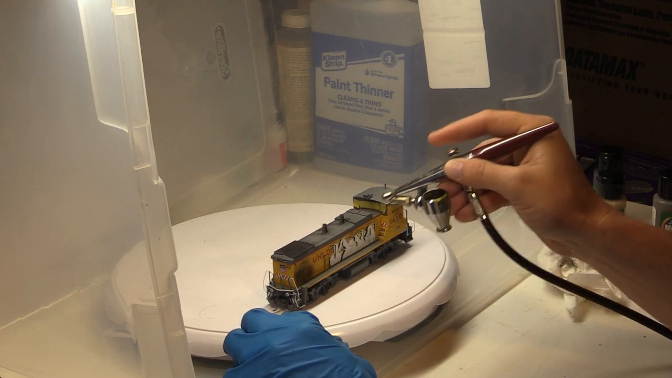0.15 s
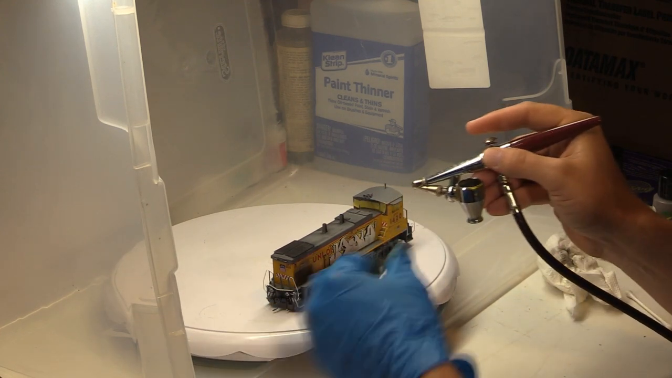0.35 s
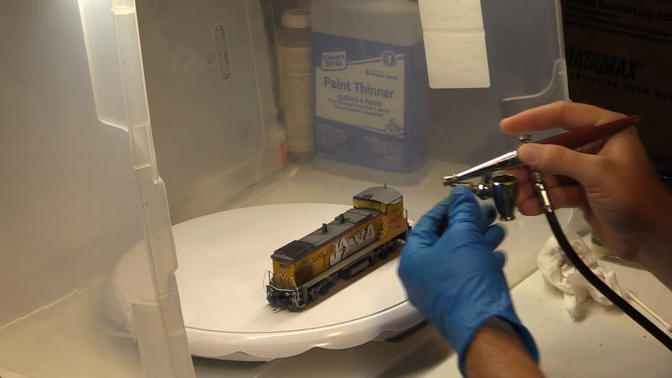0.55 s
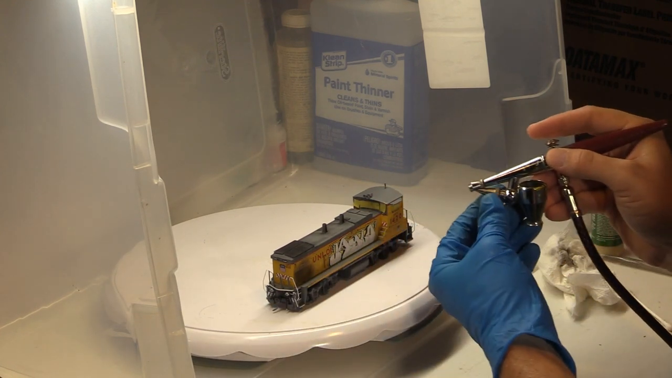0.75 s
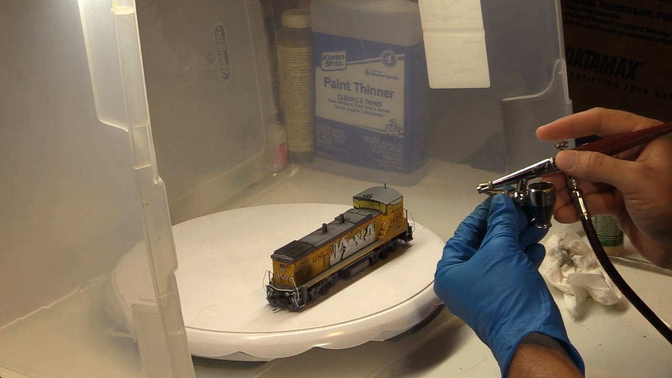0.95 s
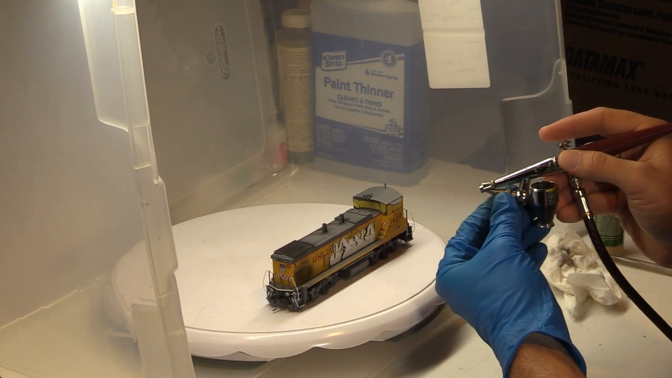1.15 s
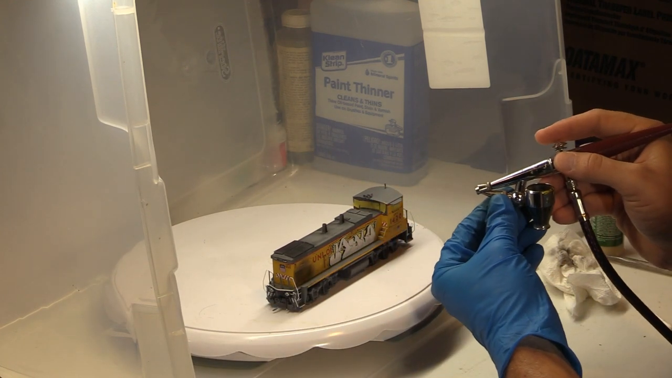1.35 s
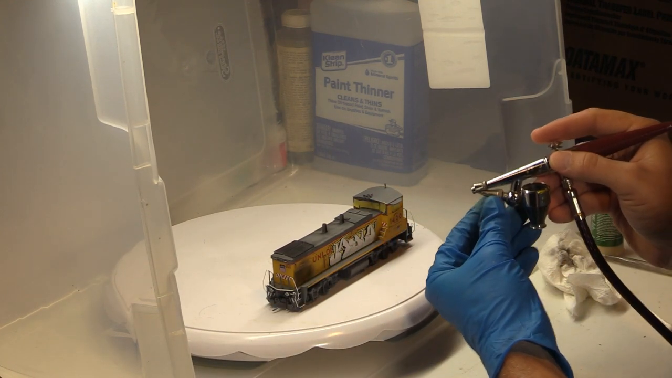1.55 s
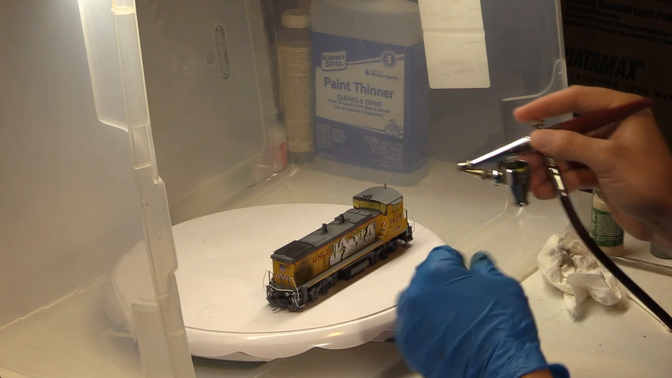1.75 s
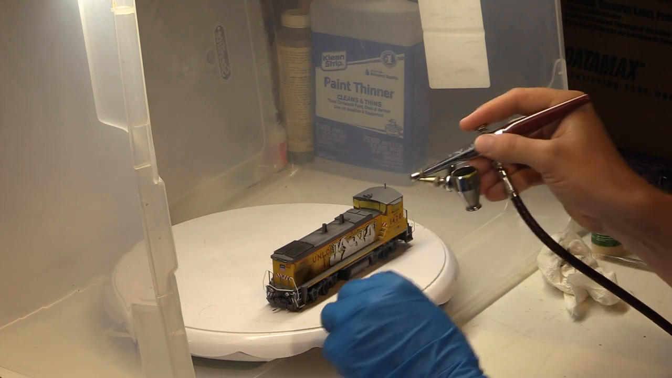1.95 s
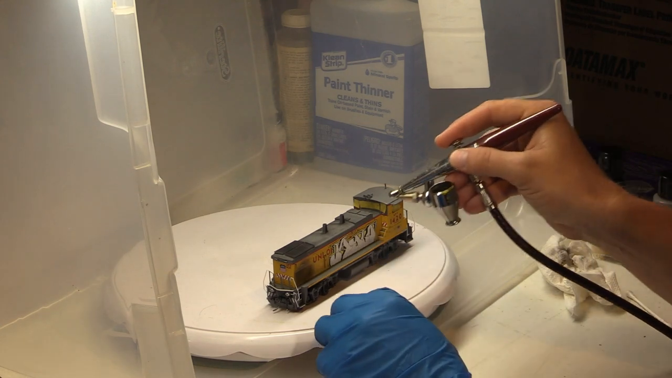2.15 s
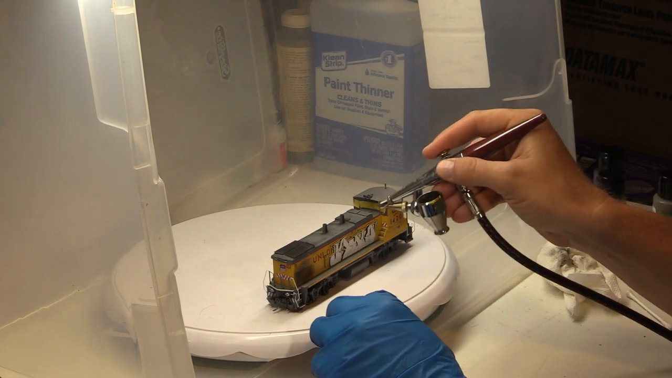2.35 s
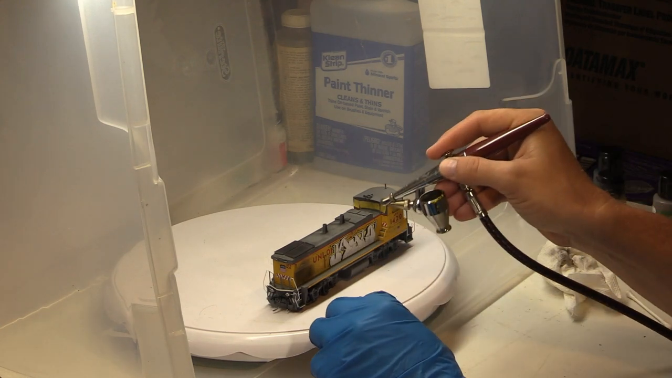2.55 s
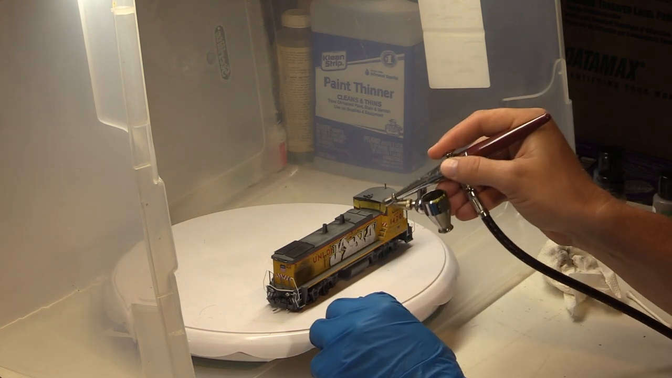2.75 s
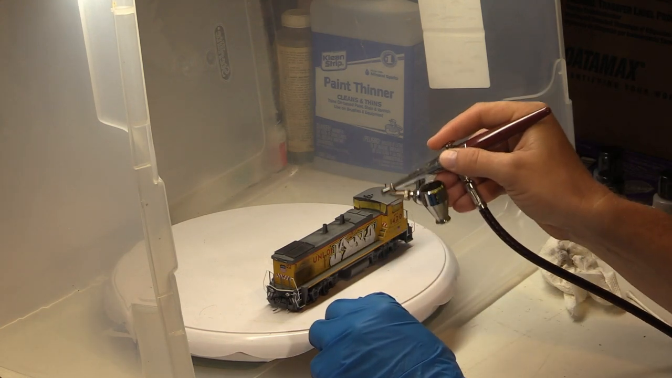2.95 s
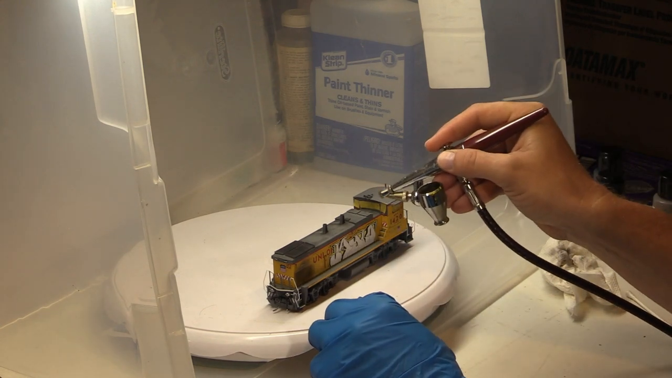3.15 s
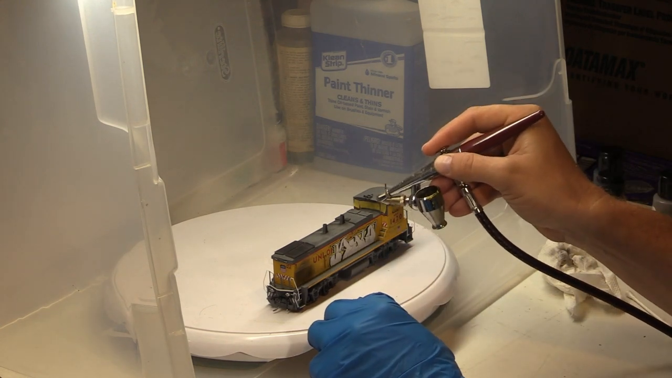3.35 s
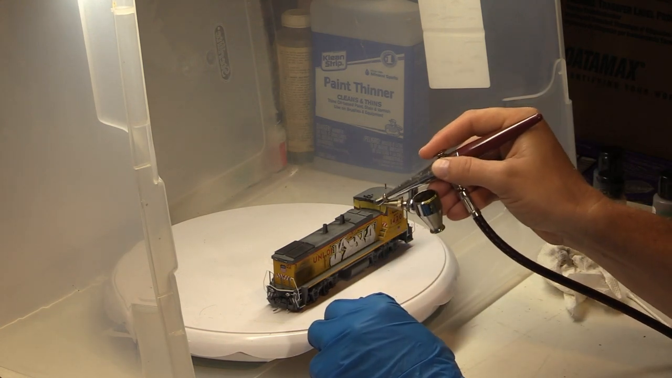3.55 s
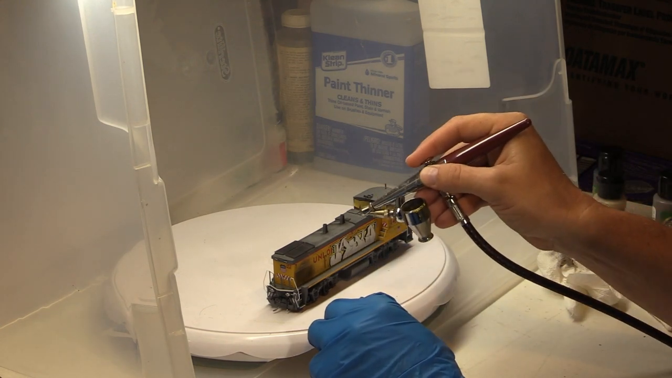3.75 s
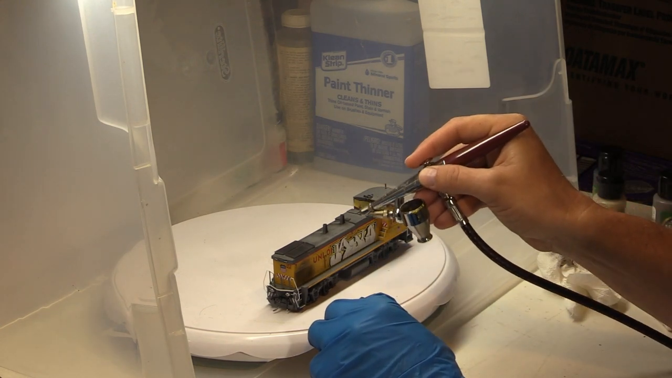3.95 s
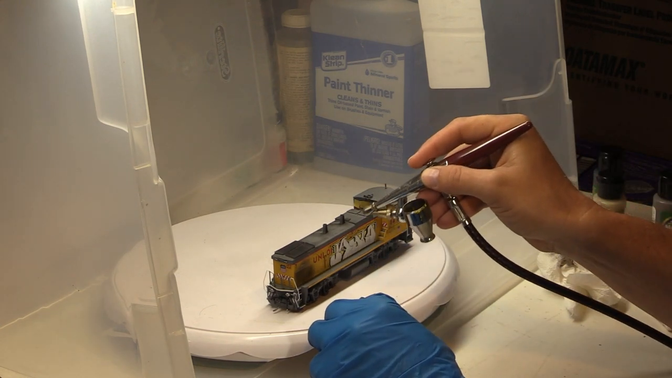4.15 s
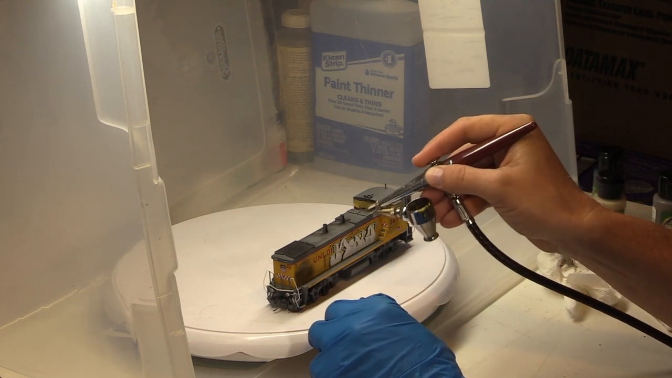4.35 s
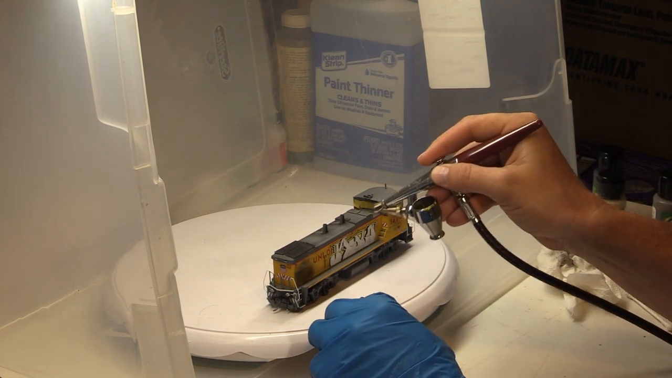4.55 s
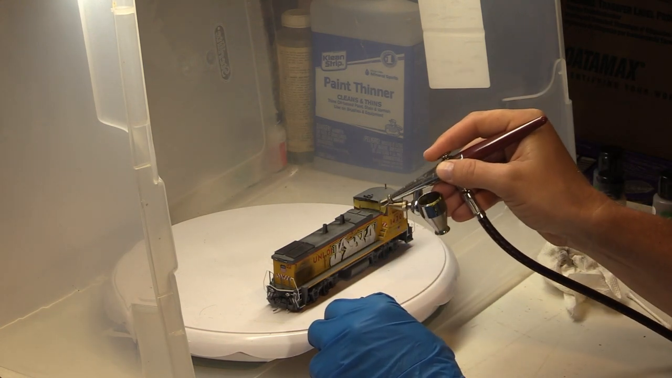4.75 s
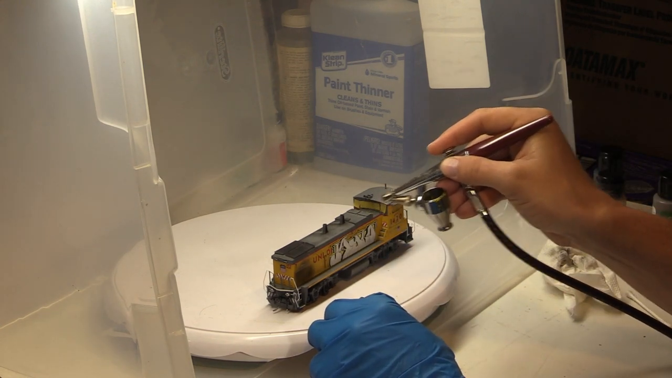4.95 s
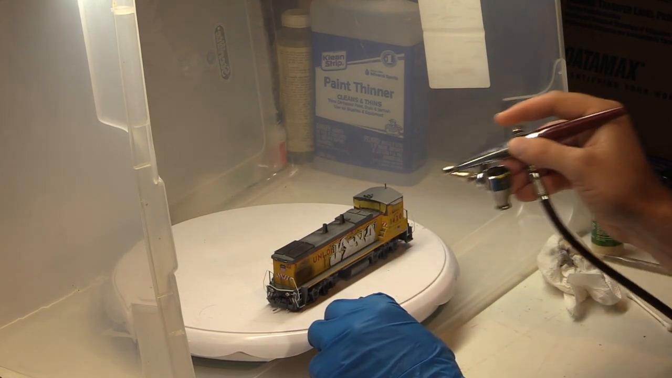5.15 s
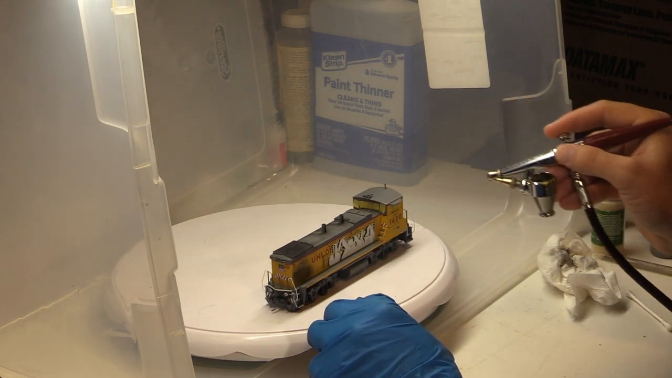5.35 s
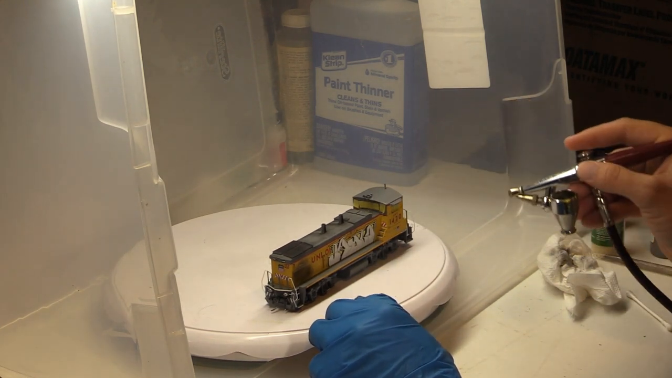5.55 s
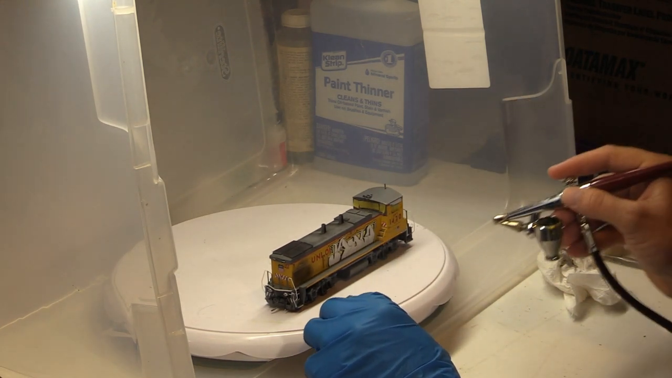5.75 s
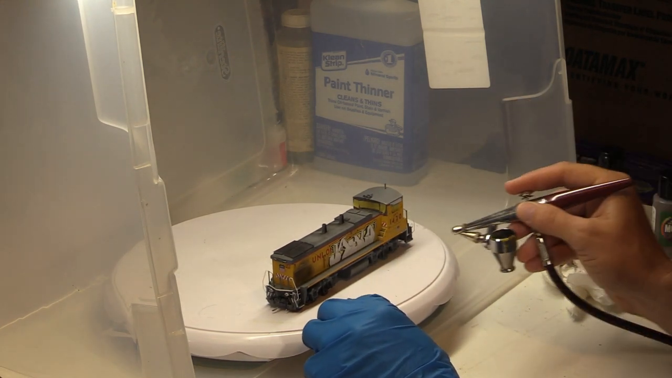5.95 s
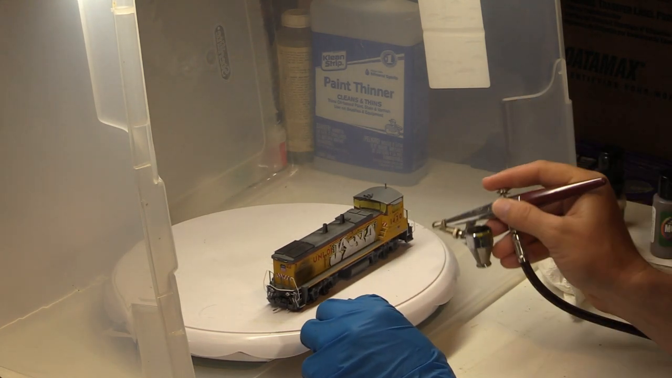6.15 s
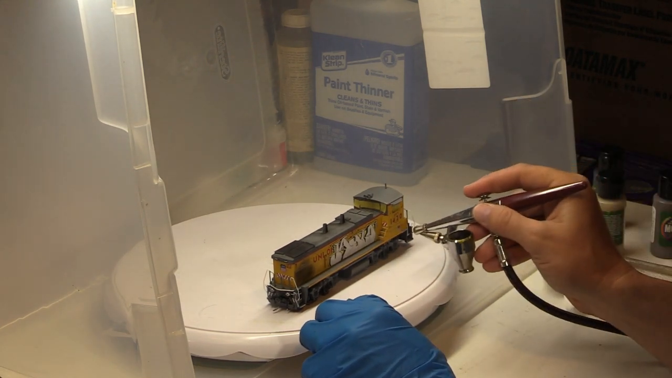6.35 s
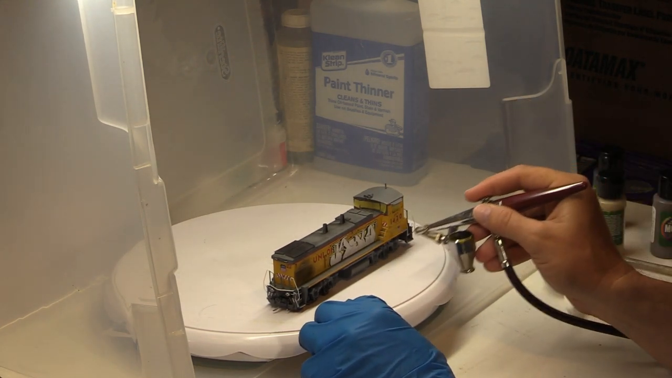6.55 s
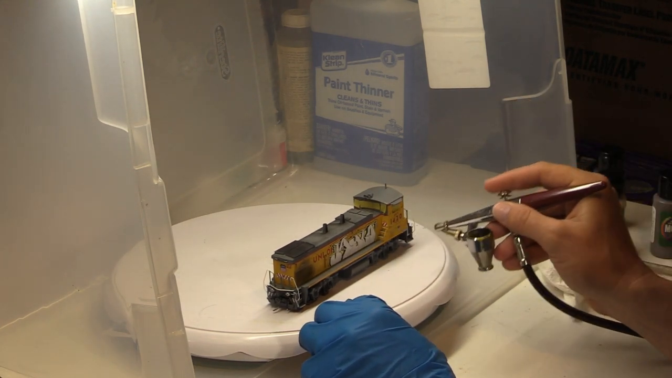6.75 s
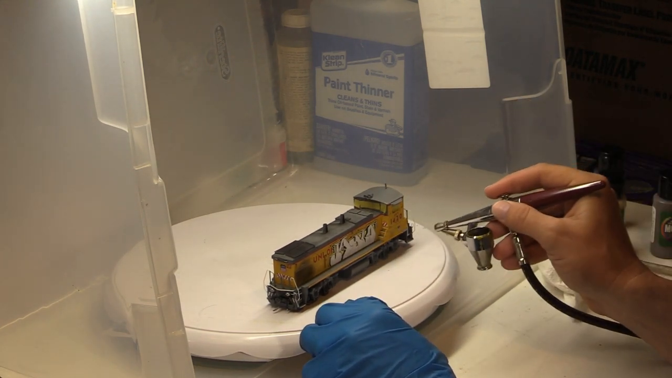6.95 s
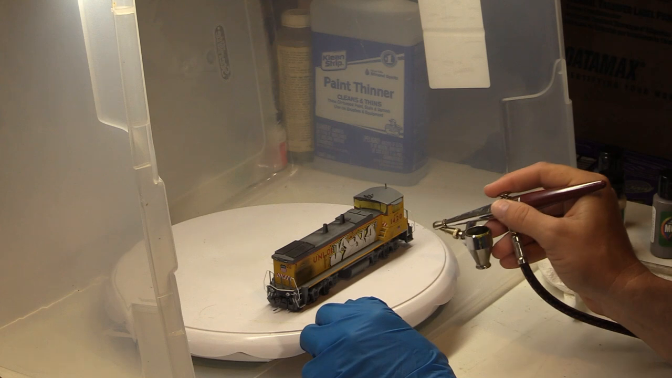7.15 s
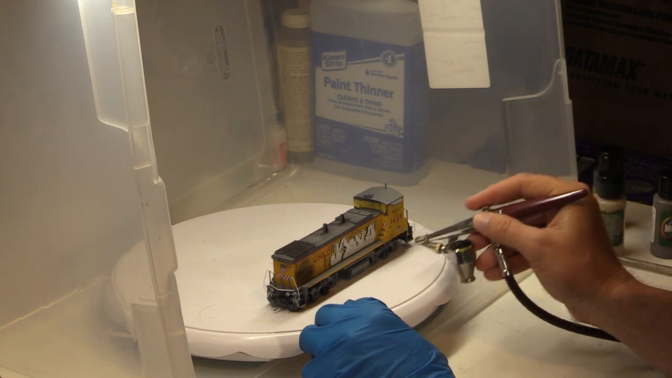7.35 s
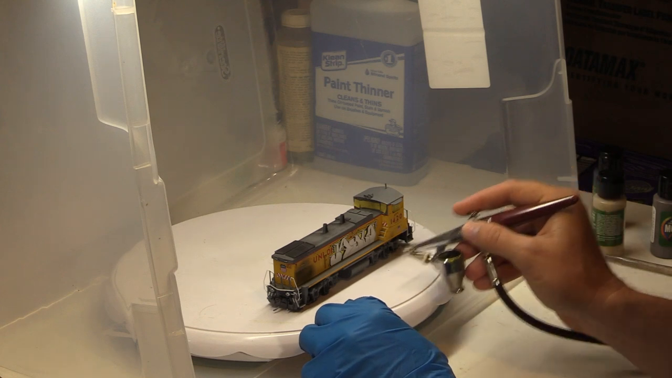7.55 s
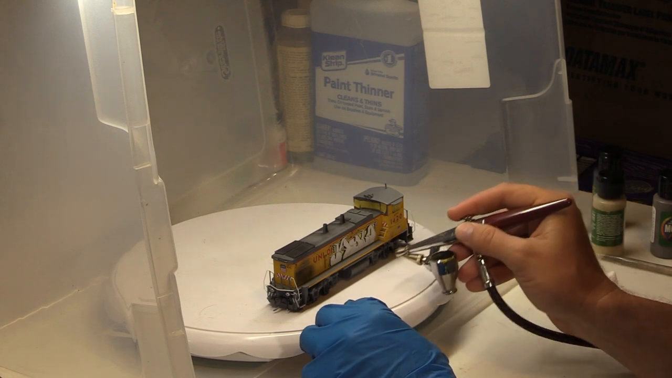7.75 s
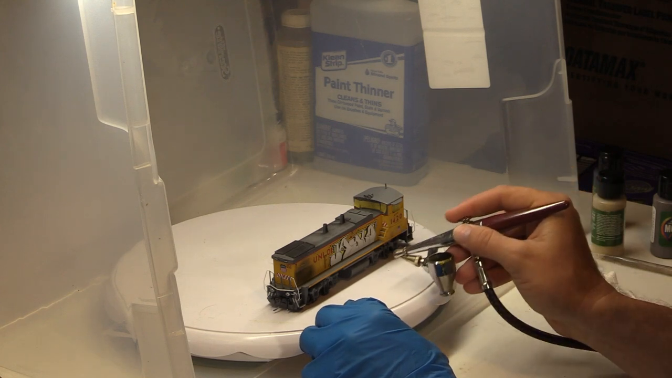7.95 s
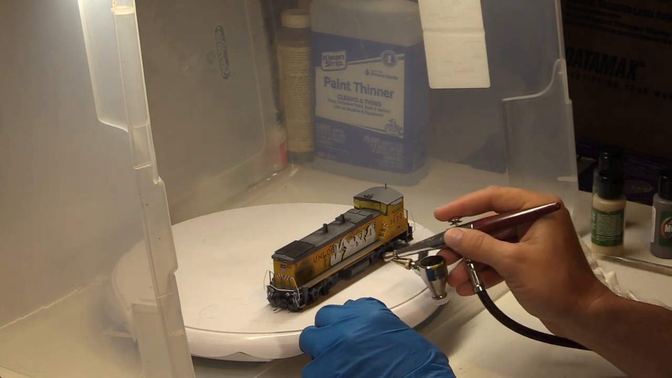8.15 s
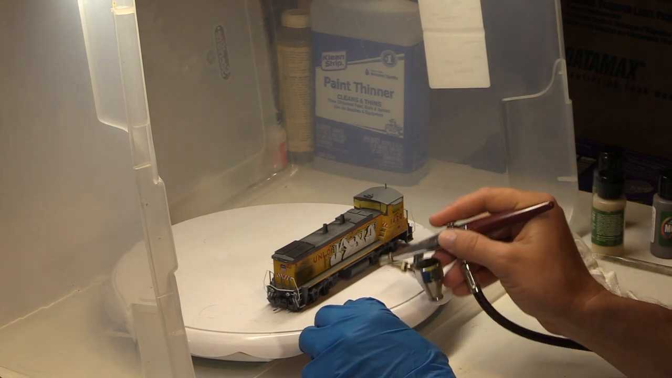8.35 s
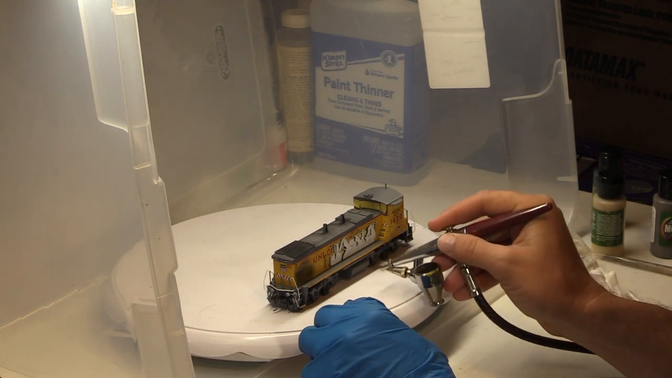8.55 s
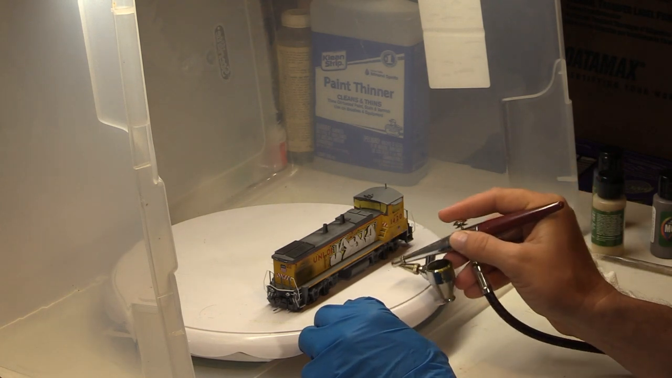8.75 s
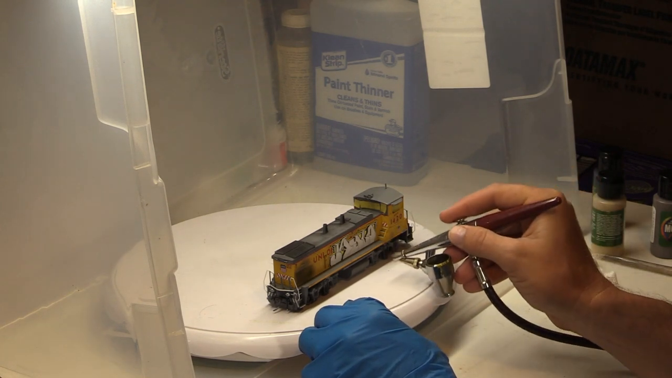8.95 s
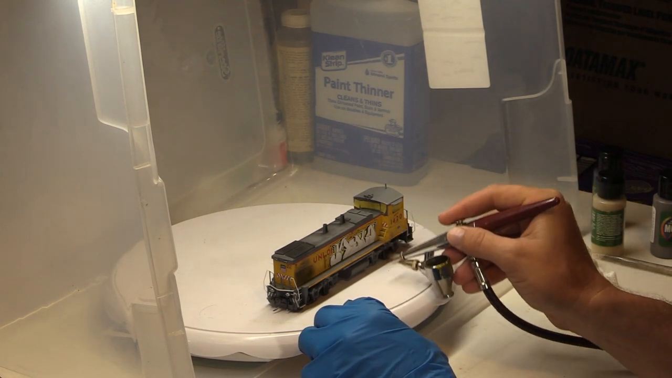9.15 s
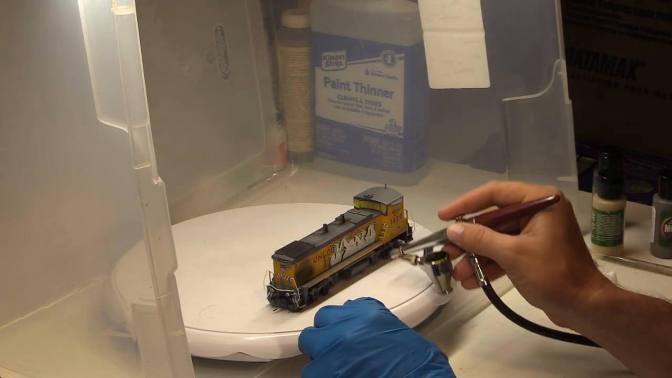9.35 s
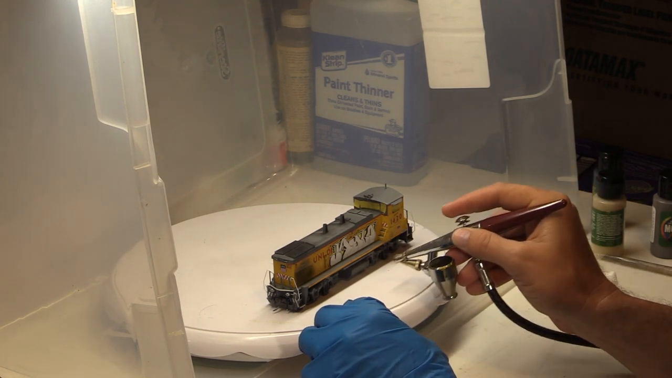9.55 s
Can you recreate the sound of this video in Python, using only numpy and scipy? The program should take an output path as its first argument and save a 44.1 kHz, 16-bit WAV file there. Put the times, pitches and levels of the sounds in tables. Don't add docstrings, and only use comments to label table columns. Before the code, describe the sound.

Close airbrush spraying in a small plastic booth at an indoor bench. A brief hiss ends, a glove rubs softly and the compressor stops with a sharp air spit. After a pause comes a long, fluttering burst, another compressor stop, then several shorter bursts. A fan washes steadily behind. One close microphone, heard on the right only, with faint hiss on the left.

```python
import sys
import numpy as np
from scipy import signal
from scipy.io import wavfile
from scipy.ndimage import uniform_filter1d

SR = 44100
rng = np.random.default_rng(int(sys.argv[2]) if len(sys.argv) > 2 else 0)


def magnitude_from_level(level_db):
    exponent = np.asarray(level_db, float) / 20
    return 10 ** exponent


def generate_wav(signal):
    frames = np.transpose(np.atleast_2d(signal))
    scaled = np.clip(frames, -1, 1) * 32767
    pcm = np.round(scaled).astype(np.int16)
    wavfile.write(sys.argv[1], SR, pcm)


N = 423360
T = np.arange(N) / SR

# press in seconds, release in seconds, opening time in seconds,
# nozzle hiss level in dB, share of cavity ringing [ratio].
TRIGGER = [
    (-.1, 0.278, 0.022, -48.5, 0.43),
    (2.534, 5.173, 0.022, -48, 0.79),
    (6.594, 6.859, 0.012, -49, 1.1),
    (7.113, 7.617, 0.016, -47, 0.71),
    (7.776, 8.286, 0.019, -47.5, 1),
    (8.425, 8.871, 0.0033, -49, 0.84),
    (9.07, 9.9, 0.021, -49, 1.8),
]


def evened(x):
    return x / np.sqrt(np.mean(x ** 2) + 1e-20)


def hiss(points, patchy_db=1.5, flicker_db=0.44, size=512):
    hop = size // 4
    hz = np.fft.rfftfreq(size, 1 / SR)
    real, imag, patches = rng.standard_normal((N // hop + size // hop + 1, len(hz), 3)).T
    flicker = evened(uniform_filter1d(patches[0], size=3))
    patches = uniform_filter1d(patches, size=6, axis=0)
    patches = evened(uniform_filter1d(patches, size=18, axis=1))
    point_hz, point_db = np.transpose(points)
    colour_db = np.interp(np.log(hz + 1), np.log(point_hz), point_db)[:, None]
    spectra = (real + 1j * imag) * magnitude_from_level(colour_db + patchy_db * patches + flicker_db * flicker)
    return evened(signal.istft(spectra, nperseg=size, noverlap=size - hop)[1][:N])


def ring(x, modes):
    out = np.zeros(len(x))
    for hz, width, db in modes:
        b, a = signal.iirpeak(hz, hz / width, SR)
        out += magnitude_from_level(db) * signal.lfilter(b, a, x) / np.sqrt(width)
    return evened(out)


def room():
    # frequency in Hz, density in dB per Hz.
    fan_colour = [(22, -34), (40, -7.5), (134, -5), (300, -4), (800, -3.5), (950, -4.5), (1300, -1),
                  (2100, -5), (3300, -5), (4300, -9), (5400, -16.5), (8000, -22), (11500, -23),
                  (16500, -24.5)]
    # frequency in Hz, width in Hz, level in dB.
    duct = [(409.6, 19, -6), (1212, 59, -4), (1321, 60, 0.5), (1484, 23, -0.5), (1627, 32, -7.5)]
    # frequency in Hz, level in dB.
    fan_tones = [(30.0, -69), (821, -71.5)]
    # time in seconds, level in dB.
    glove_levels = [(.25, -56), (.45, -55), (.6, -57), (.8, -59), (1.0, -58.5), (1.3, -62), (1.7, -77)]
    glove_colour = [(500, -32), (1100, 4), (1800, 3.5), (4300, -1.5), (6000, -38)]  # (Hz, dB per Hz)

    wash = magnitude_from_level(-51.5) * hiss(fan_colour, 0.66, 0, size=2048)
    duct_air = magnitude_from_level(-62) * ring(rng.standard_normal(N), duct)
    waver = 1 + 0.38 * evened(uniform_filter1d(rng.standard_normal(N), size=6000))
    tones = sum(magnitude_from_level(db) * waver * np.sin(2 * np.pi * hz * T) for hz, db in fan_tones)
    rub_s, rub_db = np.transpose(glove_levels)
    glove = magnitude_from_level(np.interp(T, rub_s, rub_db, -120, -120)) * hiss(glove_colour, 2.3, 2.2)
    return wash + duct_air + tones + glove


def motor():
    # switch on in seconds, cut out in seconds.
    runs = [
        (-1.5, .71),
        (3.13, 5.88),
        (7.45, 10.4),
    ]
    run_levels = [-55.5, -56, -54.5]
    shaft_hz, sag_hz_per_s, spin_up_hz, coast_hz_per_s = 27.05, 0.04, 0.9, 1.1
    spin_up_s, spin_up_db, warm_s, warm_db = 0.055, -3, 0.6, -2
    coast_s, coast_db_per_s, strain_s = 0.14, -85, 0.45

    hz, gain, strain = np.full(N, shaft_hz), np.zeros(N), np.zeros(N)
    for (on, off), db in zip(runs, run_levels):
        age, late = np.maximum(T - on, 0), np.maximum(T - off, 0)
        running = (T >= on) & (late < coast_s)
        kick = np.exp(-age / spin_up_s)
        hz -= running * (sag_hz_per_s * age + spin_up_hz * kick + coast_hz_per_s * late)
        run_db = db + spin_up_db * kick + warm_db * np.exp(-age / warm_s) + coast_db_per_s * late
        gain += running * magnitude_from_level(run_db)
        strain += running * np.clip(1 + (T - off) / strain_s, 0, 1)
    return hz, gain, strain


def compressor():
    # multiple of the shaft speed [ratio], level in dB.
    casing = [(13, -20), (15, -11.5), (17, -17), (21, -19), (24, -16), (25, -10.5), (26, -13.5), (27, -3.5),
              (28, -1), (29, -15.5), (36, -12.5), (39, -17)]
    # frequency in Hz, density in dB per Hz.
    clatter_colour = [(250, -19), (400, -2), (750, 3), (1200, 0.5), (2000, 0.5), (3000, -25)]
    strained, strain_db = 28, 4

    hz, gain, strain = motor()
    wobble = evened(uniform_filter1d(rng.standard_normal(N), size=3000))
    turn = 2 * np.pi * np.cumsum(hz * (1 + 0.0007 * wobble)) / SR
    knots = T[::2048]
    wavers = evened(uniform_filter1d(rng.standard_normal((len(knots), len(casing))), size=3, axis=0)).T
    tones = np.zeros(N)
    for (multiple, db), waver in zip(casing, wavers):
        tone_db = db + 1.2 * np.interp(T, knots, waver) + strain_db * strain * (multiple == strained)
        tones += magnitude_from_level(tone_db) * np.cos(round(multiple) * turn + 1.2 * rng.standard_normal())
    clatter = hiss(clatter_colour, size=1024) * (1 + 0.42 * np.cos(turn))
    return gain * (evened(tones) + magnitude_from_level(-2.5) * clatter)


def relief():
    # start in seconds, level in dB.
    spits = [
        (0.708, -33),
        (5.88, -32.5),
    ]
    # frequency in Hz, width in Hz, level in dB.
    vent = [(7700, 430, -5), (8340, 270, -12), (9830, 490, -9), (11050, 350, -9.5), (12900, 550, -10),
            (14900, 450, -20), (4090, 170, -4)]
    # frequency in Hz, width in Hz, level in dB.
    valve_body = [(1800, 350, -4), (4100, 120, 2), (4960, 190, -4), (5300, 160, -2), (7740, 200, -16),
                  (13300, 300, -8)]

    out, age = np.zeros(N), T[:SR // 4]
    blow = np.zeros(len(age))
    for late, strength in [(0.0005, 0.26), (0.0016, -0.95), (0.0047, 0.4)]:
        blow[round(late * SR)] = strength
    flow = 0.15 * np.exp(-age / 0.0088) + 0.47 * np.exp(-age / 0.035)
    flow *= np.minimum(age / 0.003, 1)
    for start, db in spits:
        air = magnitude_from_level(-6.5) * flow * ring(rng.standard_normal(len(age)), vent)
        snap = magnitude_from_level(-26.0) * ring(blow, valve_body)
        out[round(start * SR):][:len(age)] += magnitude_from_level(db) * (air + snap)
    return out


def swells(rows):
    knots = T[::64]
    total_db = sum(db * np.clip(1 - abs(knots - s) / half, 0, 1) for s, half, db in rows)
    return np.interp(T, knots, total_db)


def aim():
    # splash on flat panels in dB, blowing into hollows in dB,
    # scatter off edges in dB, air over small openings in dB.
    burst_aim = [(-46, -47, -52, -52.5), (-49.5, -50.5, -53.5, -55), (-47, -42.5, -46.5, -54),
                 (-47, -44, -48.5, -55), (-47.5, -46, -50, -59), (-45.5, -44, -49, -60.5),
                 (-45, -39.5, -44.5, -52.5)]
    # time in seconds, half length in seconds,
    # swell from hollows in dB, swell from flat panels in dB.
    crossings = [(0.155, .06, 3, -3), (.27, .04, 3, 2.5), (2.59, 0.04, 2, 8.5), (2.704, 0.036, 4.5, 1.5),
                 (2.933, .08, 5, 5.5), (3.09, 0.044, 4, 4), (3.346, .04, 4, 3.5), (3.56, 0.047, 6.5, 6),
                 (3.647, 0.026, 5, -1), (3.806, 0.038, 9, 3), (3.902, 0.024, 6.5, 6), (4.045, .06, 3, 3.5),
                 (4.218, 0.14, 5, 3), (4.465, 0.19, 5, 4), (4.72, 0.095, 1.5, 4.5), (4.85, 0.071, 4, 2),
                 (5.05, 0.12, 5, 3), (6.62, 0.044, 2.5, -2), (6.733, 0.057, 12.5, 0), (7.135, 0.12, 4, 1),
                 (7.43, 0.13, 4.5, 1.5), (7.593, 0.033, 4, 1.5), (7.923, 0.046, 13, 5),
                 (8.048, 0.054, 4.5, 2.5), (8.457, 0.045, 5, 2), (8.636, 0.12, 8, 3), (8.847, 0.078, 8, 3),
                 (9.146, 0.061, 4.5, 0.5), (9.303, .08, 5, 1.5), (9.502, 0.078, 2.5, -0.5)]
    # time in seconds, swell in dB.
    openings = [(.169, 7.5), (3.25, 7), (3.33, 6.5), (3.43, 6), (3.56, 6), (3.65, 9.5), (3.8, 1), (3.9, 3),
                (4.04, 5), (4.24, 9), (4.48, 4), (5.08, 8.5), (6.73, 5.5), (7.135, -1), (7.425, 3),
                (7.93, 4), (8.127, 9), (8.44, 7.5), (8.626, 14.5), (9.159, 0), (9.3, 1), (9.525, 7.5),
                (9.58, -1)]
    # time in seconds, half length in seconds, dip in dB.
    misses = [(2.66, .03, -2), (2.81, 0.066, 0), (3.21, 0.064, -6.5), (3.383, 0.049, -7),
              (3.48, 0.056, -1.5), (3.95, .04, -1), (5.16, 0.046, -2), (6.82, .06, -2.5), (7.8, 0.063, -7),
              (8.75, 0.053, -1), (9.406, 0.054, -14)]
    flick_s = 0.042
    splash_per_miss, scatter_per_hollow, scatter_per_opening = 0.5, 0.47, 0.47

    presses = [row[0] for row in TRIGGER]
    burst = np.maximum(np.searchsorted(presses, T + 0.05) - 1, 0)
    splash_db, hollow_db, scatter_db, whistle_db = np.transpose(burst_aim)[:, burst]
    s, half, hollow, panel = np.transpose(crossings)
    miss = swells(misses)
    opening = swells([(at, flick_s, db) for at, db in openings])
    hollow = swells(zip(s, half, hollow)) + miss
    panel = swells(zip(s, half, panel)) + splash_per_miss * miss
    scatter_db = scatter_db + scatter_per_hollow * hollow + scatter_per_opening * opening
    return splash_db + panel, hollow_db + hollow, scatter_db, whistle_db + opening


def hollows():
    # frequency in Hz, width in Hz, level in dB.
    cavity_modes = [
        [(2000, 34, -2), (2620, 46, 0), (3670, 210, 2), (4270, 130, -2)],
        [(2310, 800, 3.5), (2900, 160, 4.5), (3295, 92, 2.5)],
        [(2590, 45, -10), (3080, 39, 0), (3310, 41, -1.5), (4250, 65, -6.5)],
        [(2260, 47, -18), (2620, 47, -8), (3130, 110, 2), (3260, 60, 5), (3510, 19, 1)],
        [(2040, 34, -10), (3290, 50, 1.5), (3560, 180, 0), (4130, 110, -3)],
        [(2050, 120, 1), (3200, 23, -6), (3450, 250, 3), (4250, 54, -3)],
        [(2640, 84, -16), (3026, 56, -1), (3410, 91, -1), (3570, 100, 0.5), (4180, 67, -6)],
    ]
    # frequency in Hz, density in dB per Hz.
    ridge_colour = [(1800, -33.5), (2600, -6.5), (3000, -3), (3600, 1), (4000, -7), (4500, -9.5),
                    (6000, -30.5)]

    drive = hiss([(1200, -30), (2000, 2.0), (4400, -1.0), (6000, -16)], 1.6, 0.93)
    out = hiss(ridge_colour, 1.2, 0.78)
    for (on, off, rise, db, share), modes in zip(TRIGGER, cavity_modes):
        part = (T > on) & (T < off + 0.02)
        cavities = ring(drive[part], [(hz, max(width, 60), level) for hz, width, level in modes])
        out[part] = evened(out[part] + share * cavities)
    return out


def booth(x, t60=0.21, wet_db=-8, drift_hz=0.81):
    t = T[:SR // 4]
    signs = rng.choice([-1., 1.], (2, len(t)))
    struck = (rng.random((2, len(t))) < 0.06) * (t > 0.0015)
    taps = signs * struck * magnitude_from_level(-60 * t / t60)
    taps = taps / np.linalg.norm(taps[0])
    turn = 2 * np.pi * drift_hz * T
    feeds = x * np.array([np.cos(turn), np.sin(turn)])
    return x + magnitude_from_level(wet_db) * signal.oaconvolve(feeds, taps, axes=1)[:, :N].sum(0)


def airbrush():
    # frequency in Hz, density in dB per Hz.
    splash_colour = [(300, -22), (700, -11.5), (1000, -8.5), (1400, -4.5), (1750, -6), (2250, -0.5),
                     (2700, -3), (3400, -8.5), (5000, -23)]
    # frequency in Hz, density in dB per Hz.
    scatter_colour = [(2500, -33), (4200, -2.5), (5200, -2), (6500, -4.5), (7500, -5.5), (9500, -6),
                      (11000, -8.5), (14000, -34)]
    # frequency in Hz, density in dB per Hz.
    nozzle_colour = [(5000, -25), (8000, -8), (10000, -4.5), (11500, -2), (13000, -3), (14600, 3.5),
                     (15200, 3.5), (16500, -18)]
    # frequency in Hz, width in Hz, level in dB.
    whistle_modes = [(11550, 290, -6), (12240, 600, 0)]
    # time in seconds, level in dB.
    needle_levels = [(2.5, -62), (3.3, -64), (3.7, -67), (5.2, -72)]

    splash_db, hollow_db, scatter_db, whistle_db = aim()
    opened, nozzle_gain = np.zeros(N), np.zeros(N)
    for on, off, rise, db, share in TRIGGER:
        valve = np.clip((T - on) / rise, 0, 1) * np.clip(1 - (T - off) / 0.014, 0, 1)
        leak = 0.14 * (T > on - 0.012) * (T < on + rise)
        opened += valve
        nozzle_gain += magnitude_from_level(db) * (valve + leak)
    nozzle = nozzle_gain * hiss(nozzle_colour, 2.3, 0.74, size=1024)

    whistle = ring(ring(rng.standard_normal(N), whistle_modes), [(11900, 2100, 0)])
    whistle_db = -43.0 + 1.6 * (whistle_db + 45.5)
    needle_db = np.interp(T, *np.transpose(needle_levels), -120, -120)
    aimed = magnitude_from_level(splash_db - 0.83) * hiss(splash_colour, 1.8, 1.4)
    aimed += magnitude_from_level(hollow_db - 1.74) * hollows()
    aimed += magnitude_from_level(scatter_db - 1.2) * hiss(scatter_colour)
    aimed += magnitude_from_level(whistle_db) * whistle
    aimed += magnitude_from_level(needle_db) * ring(rng.standard_normal(N), [(11380, 90, 0)])
    return booth(opened * aimed + nozzle)


def scene():
    microphone = 2 * (room() + compressor() + relief() + airbrush())
    return np.array([np.zeros(N), microphone])


def roll_off(x):
    return signal.sosfilt(signal.butter(12, 15790, fs=SR, output="sos"), x)


def record(dry):
    # start in seconds, fade back in seconds.
    dropouts = [
        (0.067, 0.011),
        (8.067, 0.015),
    ]
    gain = np.ones(N)
    for start, fade in dropouts:
        gain *= np.where(T < start, 1, np.clip((T - start) / fade, 0.03, 1))
    preamp = magnitude_from_level(-75.7) * rng.standard_normal(dry.shape)
    return roll_off(gain * dry + preamp)


dry = scene()
out = record(dry)
generate_wav(out)
```